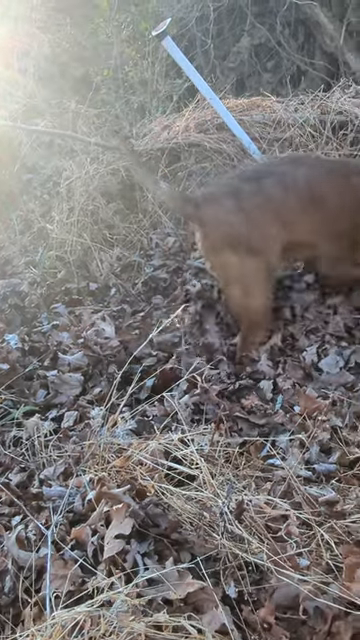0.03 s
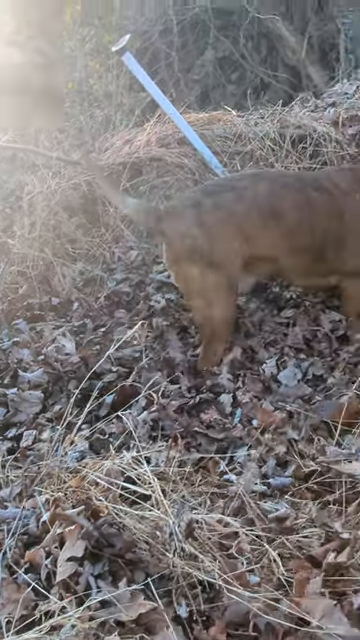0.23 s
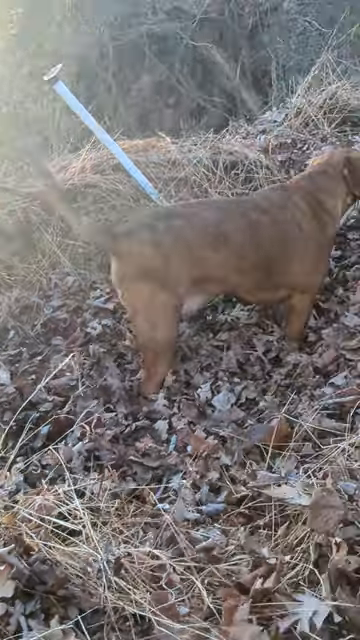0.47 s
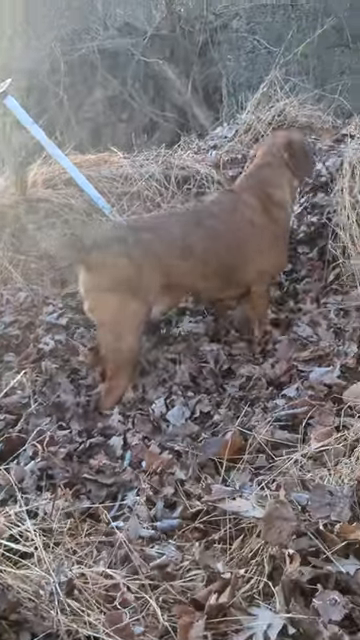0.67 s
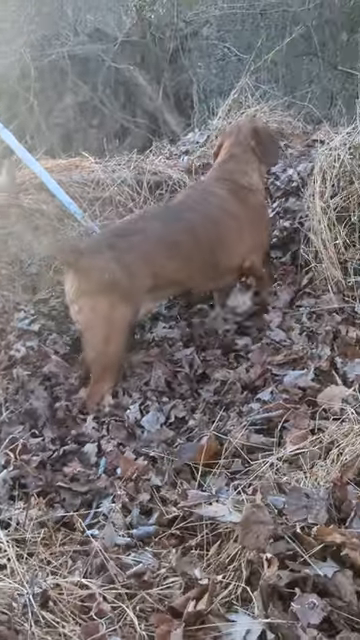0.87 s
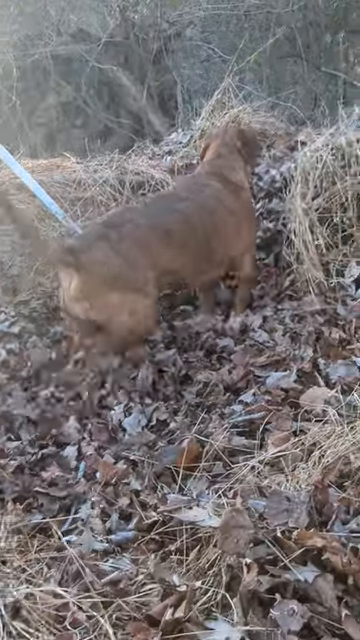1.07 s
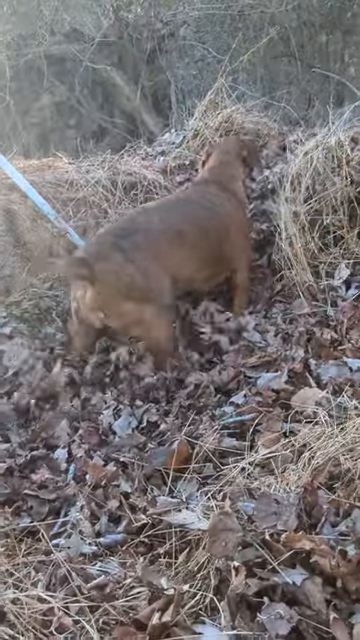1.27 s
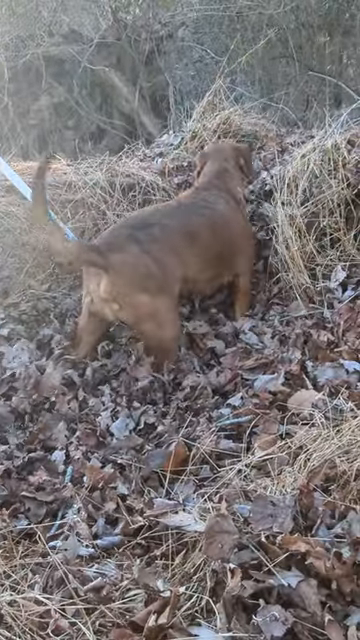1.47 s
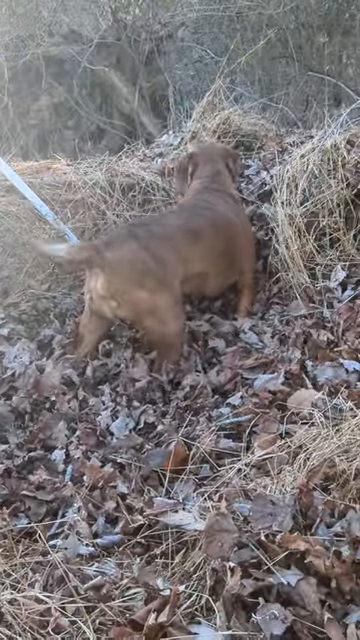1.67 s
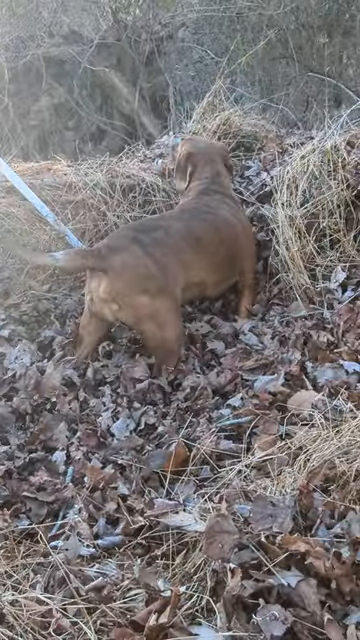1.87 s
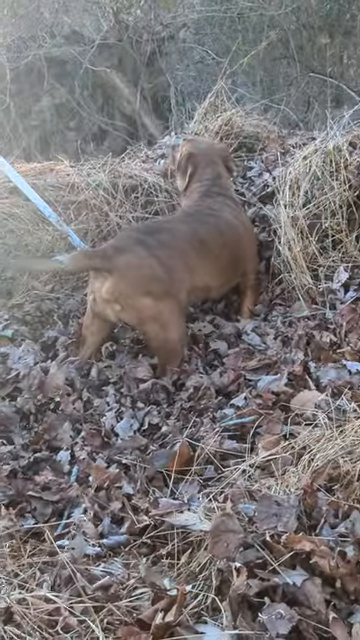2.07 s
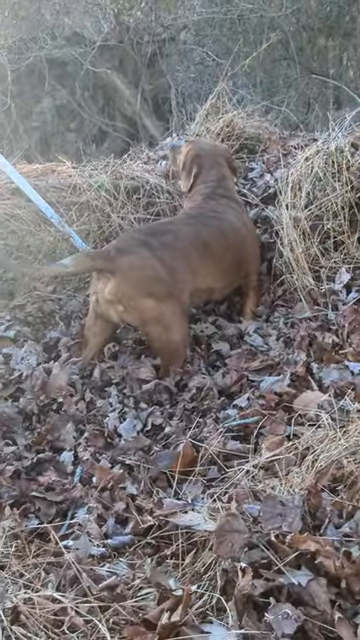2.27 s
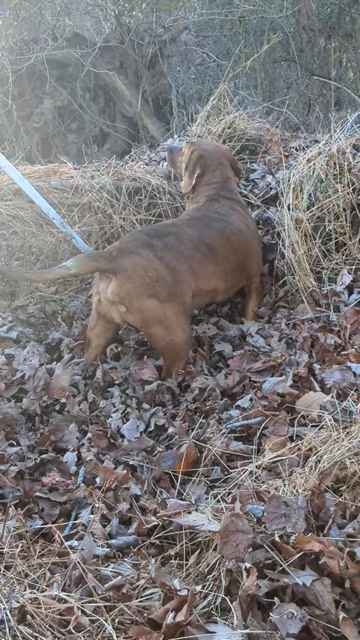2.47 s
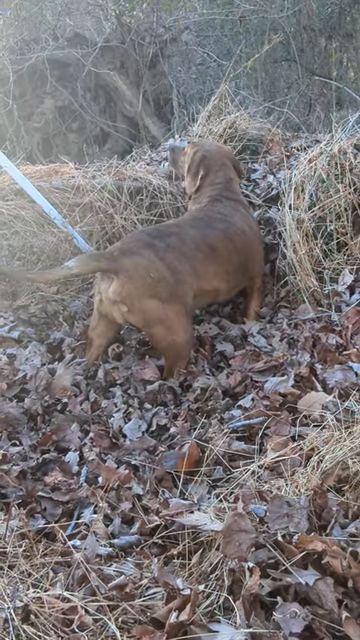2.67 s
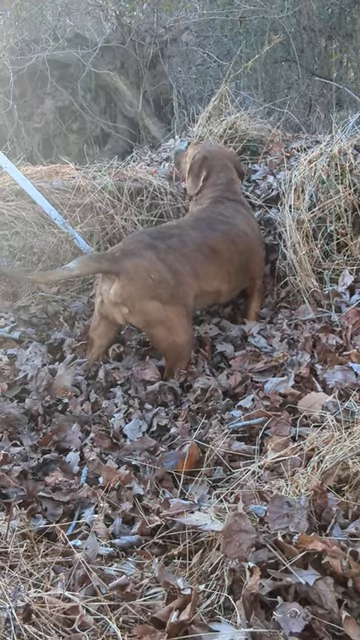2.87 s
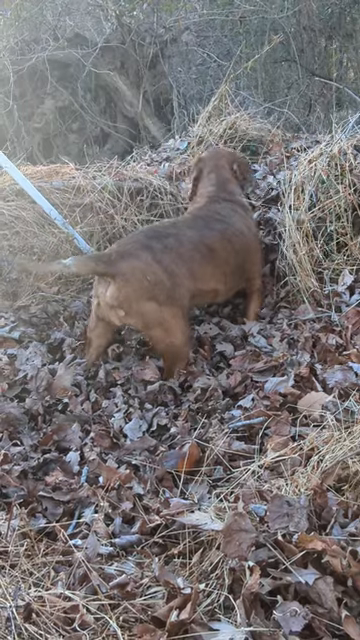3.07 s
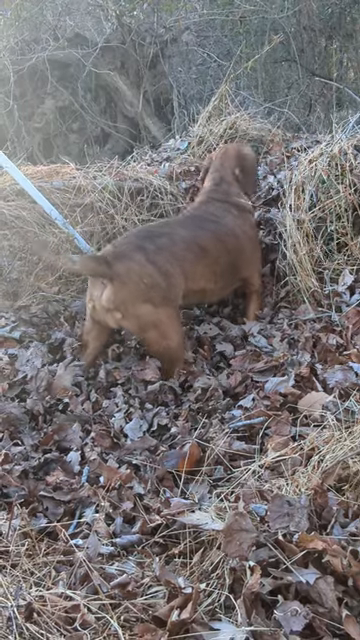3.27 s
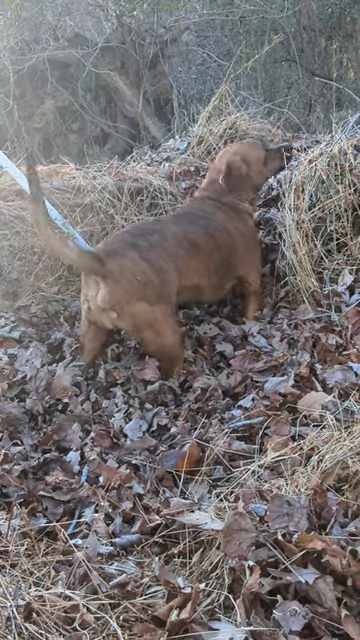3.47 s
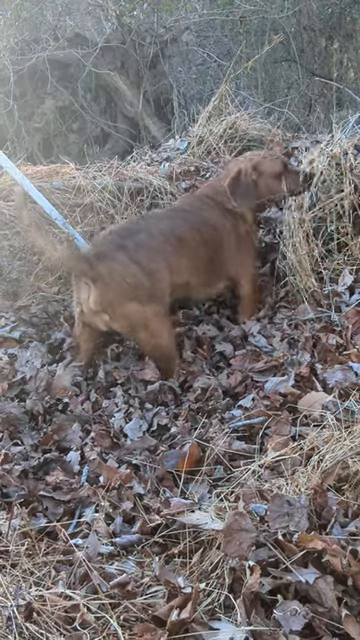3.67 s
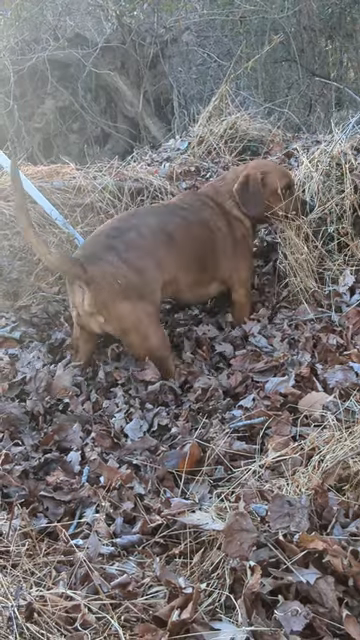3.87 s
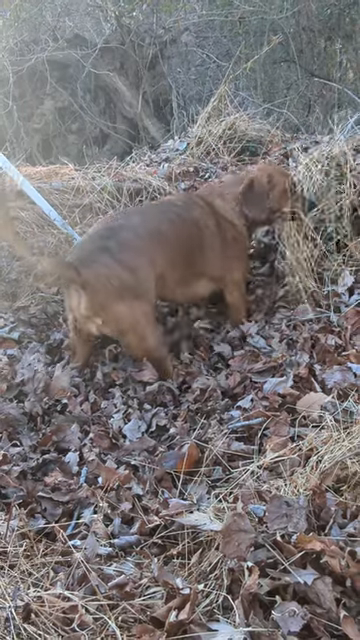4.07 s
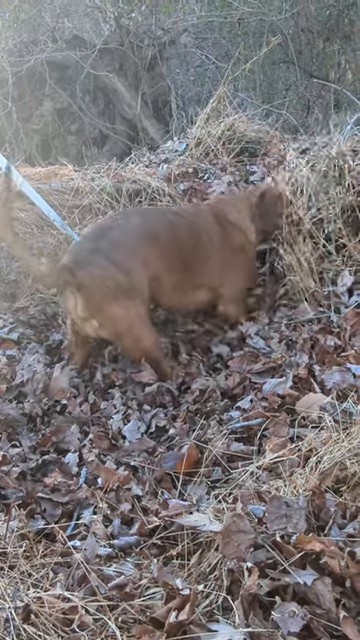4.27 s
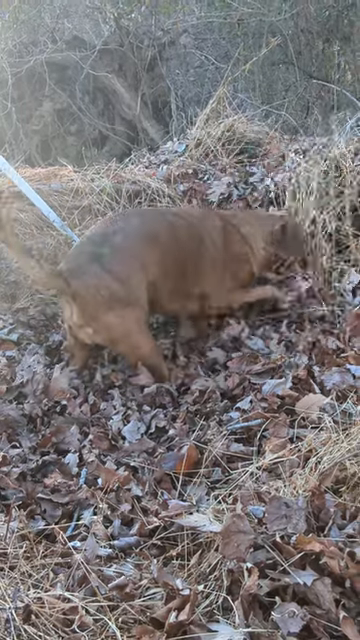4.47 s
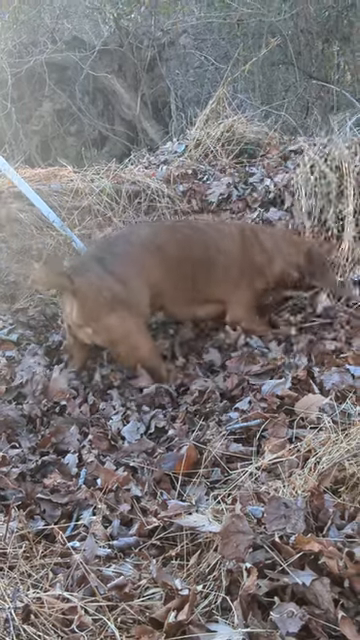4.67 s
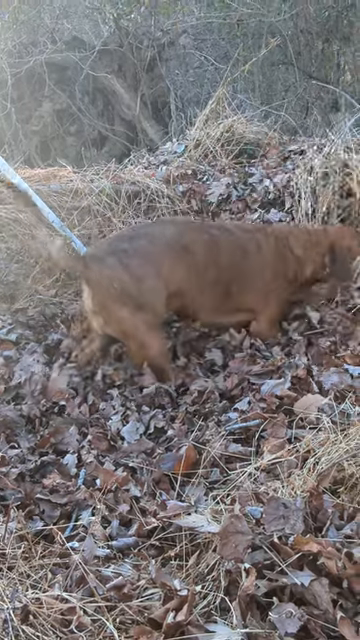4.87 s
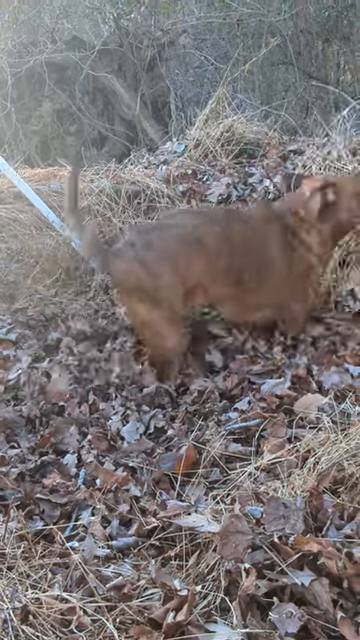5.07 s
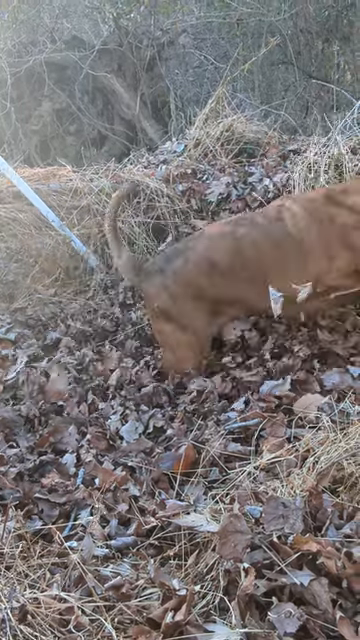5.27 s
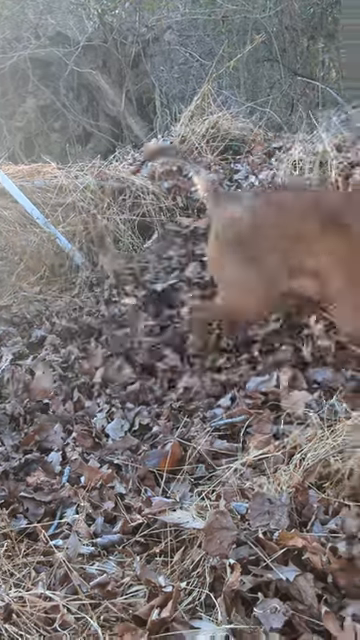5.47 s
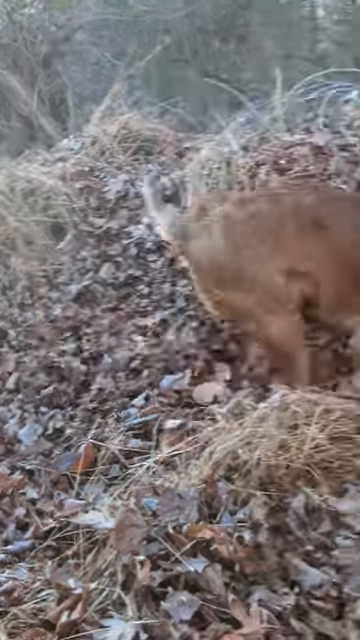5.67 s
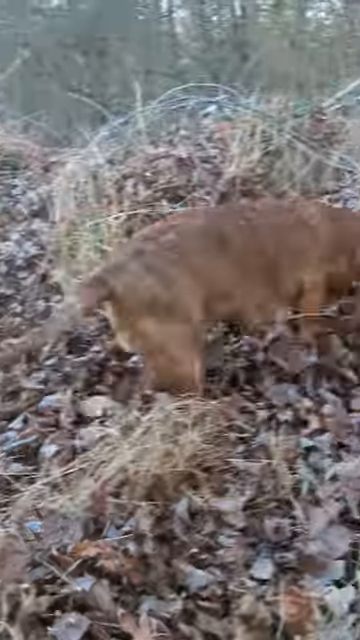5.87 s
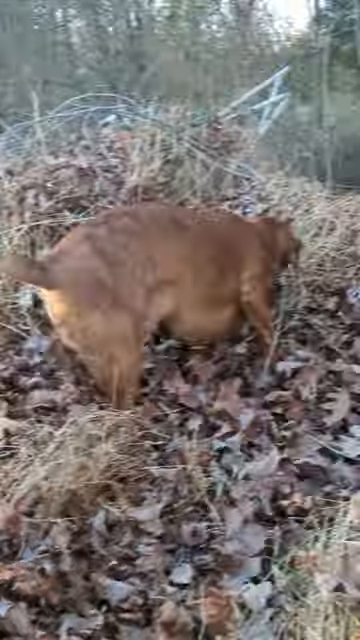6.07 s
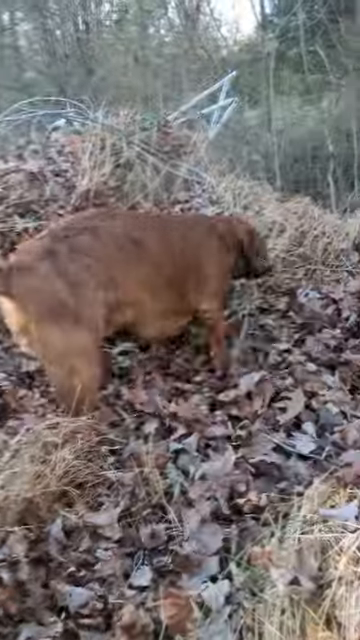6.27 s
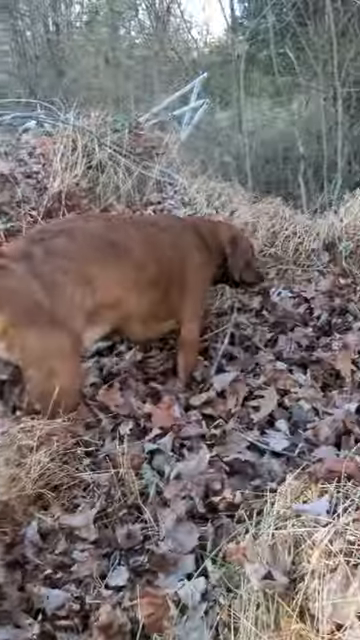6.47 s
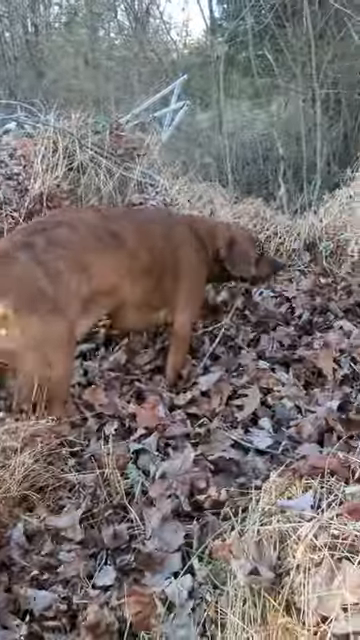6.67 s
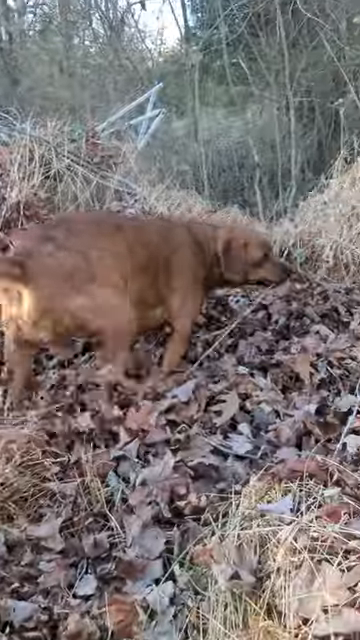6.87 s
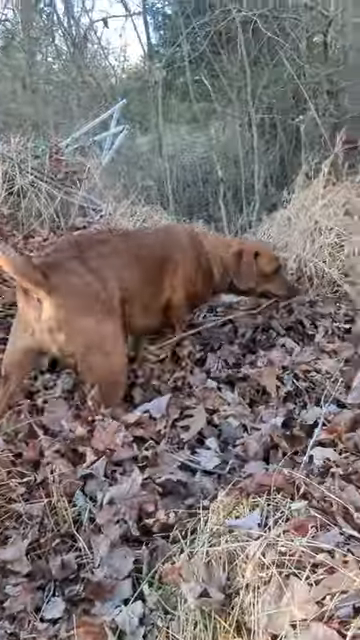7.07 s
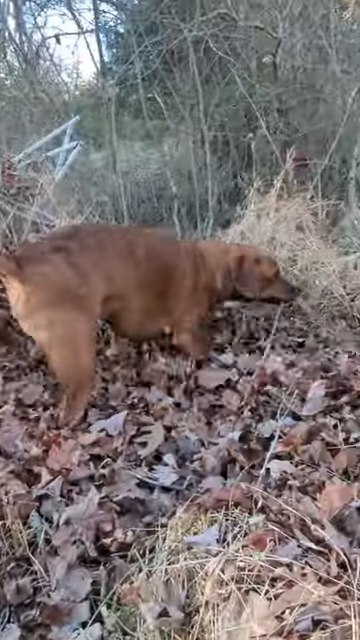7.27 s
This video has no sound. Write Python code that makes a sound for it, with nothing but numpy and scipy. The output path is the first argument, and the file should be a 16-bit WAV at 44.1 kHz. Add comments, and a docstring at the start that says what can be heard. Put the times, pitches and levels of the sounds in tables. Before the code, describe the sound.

Close stereo phone pickup of dry leaf litter being stirred in open air with no reverberation. Soft rustles and a few snaps come first, then a quiet pause with a brief scuff and sparse clicks over a faint low hum. Rustling returns in overlapping surges, strongest near the end, with sharp cracks and soft low knocks.

```python
"""Dry leaves and dead grass rustle as a dog on a leash steps and roots through them, a couple of metres from a phone.
Thousands of tiny fractures, short decaying noise bursts, make the rustle; pushes into the litter set its level.
It dies away while the dog stands, then surges as it walks on.
Stems snap as band-limited bursts, soft knocks ring as damped low modes and one brief scuff is fine-grained noise.
Behind them lie a low outdoor rumble of filtered noise and a hum of two wavering sine tones."""
import sys
import numpy as np
from scipy import signal
from scipy.fft import rfft, irfft, next_fast_len
from scipy.io import wavfile
from scipy.ndimage import uniform_filter1d

SR = 44100
rng = np.random.default_rng(int(sys.argv[2]) if len(sys.argv) > 2 else 0)


def generate_wav(signal):
    """Clip the signal to [-1, 1] and save it as 16-bit WAV at the path in sys.argv[1]."""
    frames = np.transpose(np.atleast_2d(signal))
    scaled = np.clip(frames, -1, 1) * 32767
    pcm = np.round(scaled).astype(np.int16)
    wavfile.write(sys.argv[1], SR, pcm)


N = 322415


def undb(db):
    """Amplitude gain is the exponential of a level: 20 dB for each factor of ten."""
    return 10 ** (np.asarray(db) / 20)


def curve(table):
    """Linear interpolation in time joins (time_s, value) points."""
    return np.interp(np.arange(N) / SR, *np.transpose(table))


def unit(x):
    """RMS normalization: the mean of the two channels is scaled to rms 1."""
    return x / np.sqrt(np.mean(x.mean(0) ** 2))


def shape(x, response):
    """Linear filtering is multiplication of the spectrum by a gain, a function of frequency in Hz."""
    size = next_fast_len(N + 4096, True)
    frequency_hz = np.maximum(np.fft.rfftfreq(size, 1 / SR), 1)
    filtered = irfft(rfft(x, size) * response(frequency_hz), size)
    return filtered[..., :N]


def colour(x, table, axis=1):
    """Spectral envelope: level points are joined by straight lines over log frequency."""
    table = np.asarray(table, float)
    log_hz, level_db = np.log(table[:, 0]), table[:, axis]
    return shape(x, lambda f: undb(np.interp(np.log(f), log_hz, level_db)))


def walk(rate):
    """Low-passed chance: random levels, renewed rate times a second and smoothed, with standard deviation 1."""
    k = max(int(SR / rate), 2)
    held = np.repeat(rng.standard_normal(N // k + 1), k)
    slewed = uniform_filter1d(held, k)[:N]
    return slewed / slewed.std()


def add(out, s, sound):
    """Superposition: a stereo sound is summed into the mix from time s on."""
    i = int(s * SR)
    out[:, i:i + sound.shape[1]] += sound[:, :N - i]


def rustle():
    """Crackling noise: crumpling leaves are a dense sheet of fractures with sparser crackles on it."""
    # colour of the leaves at the two microphones: frequency_hz, left_db, right_db
    leaf_colour = [(200, -12, -10), (400, -15, -14), (650, -7, -5), (1000, -8, -6), (1700, -4, -.5),
                   (2700, -2.7, -1.5), (3600, -3.5, -7.5), (4700, -7, -1), (6400, -3, 0), (7800, -8, -3),
                   (8700, -10, -4), (9500, -12.5, -10), (12300, -5, -6), (15500, -8, -8.5)]
    pan_db = 0.36  # left minus right
    sheet = unit(fractures(per_s=7000, spread_db=0.0, ring_ms=0.37, lead=1.8, lead_spread=1.6))
    crackle = unit(fractures(per_s=350, spread_db=-1.0, ring_ms=0.36, lead=1.8, lead_spread=2.6))
    leaves = scatter(sheet + undb(-8) * crackle, tail_ms=8, wet_db=-7)
    leaves = leaves * undb(0.66 * walk(60) + 0.68 * walk(25))  # leaves give way in little clusters
    leaves = shifting(leaves, drift_db=0.78, drift_rate=6.6, flicker_db=0.92)
    left = colour(leaves[0], leaf_colour, axis=1)
    right = colour(leaves[1], leaf_colour, axis=2)
    leaves = shade(np.array([left, right]), left_share=0.11, turn_s=0.093)

    # three bands, so that thick leaves and fine grass can be stirred separately
    above = lambda f, hz: 1 / (1 + (hz / f) ** 8)
    body = unit(shape(leaves, lambda f: (1 - above(f, 3070)) * f / np.hypot(f, 260)))
    middle = unit(shape(leaves, lambda f: above(f, 3310) - above(f, 8700)))
    top = unit(shape(leaves, lambda f: above(f, 8300)))
    body_gain, middle_gain, top_gain = stirring()
    mix = undb(-0.51) * body * body_gain
    mix = mix + undb(-0.4) * middle * middle_gain
    mix = mix + undb(-0.24) * top * top_gain
    return mix * undb(pan_db * np.array([[.5], [-.5]]))


def fractures(per_s, spread_db, ring_ms, lead, lead_spread, size=64):
    """Random point process of decaying cracks, each from its own direction and so with its own interchannel lag.

    lead and lead_spread are the mean and spread of the second channel's lag in samples."""
    starts = np.flatnonzero(rng.random(N) < per_s / SR)
    strength = undb(spread_db * np.minimum(rng.exponential(size=N), 3.5))[starts]
    lags = np.round(lead + lead_spread * rng.standard_normal(N)).astype(int)[starts]
    k = np.arange(size)
    cracks = rng.standard_normal(N)[(starts[:, None] * 67 + k) % N]  # slices of one noise pool
    cracks = cracks * strength[:, None] * np.exp(-k * 1e3 / (SR * ring_ms))
    channels = []
    for at in (starts, starts + lags):
        places = ((at[:, None] + k) % N).ravel()
        channels.append(np.bincount(places, cracks.ravel(), N))
    return np.array(channels)


def scatter(x, tail_ms, wet_db):
    """Diffuse scattering: the litter returns the smoothed energy of the cracks as fresh noise."""
    keep = np.exp(-1e3 / (SR * tail_ms))
    energy = signal.lfilter([1 - keep], [1, -keep], x ** 2)
    return x + undb(wet_db) * np.sqrt(energy) * rng.standard_normal((2, N))


def shifting(x, drift_db, drift_rate, flicker_db, count=10):
    """Independent band modulation: different leaves take turns, so each band swells and flickers by itself."""
    centres = np.linspace(np.sqrt(300), np.sqrt(16000), count)  # in square root of Hz
    out = 0
    for pick in np.eye(count):
        band = shape(x, lambda f: np.interp(np.sqrt(f), centres, pick))
        out = out + band * undb(drift_db * walk(drift_rate) + flicker_db * walk(90))
    return out


def shade(x, left_share, turn_s):
    """Acoustic shadowing: the hand makes peaks and notches, mostly at the right, that crossfade as the phone turns."""
    # shading by the hand at each aim: start_s, [(frequency_hz, width_hz, gain_db), ..]
    aims = [(0, [(2160, 200, 5), (2650, 140, 3), (3450, 1060, -4), (4820, 570, -3), (6000, 690, -1.5),
            (8300, 1700, -6.5)]), (1.15, [(1640, 67, 2.5), (2200, 790, -2), (2670, 110, -11),
            (2930, 490, 4.5), (3540, 880, -3), (4300, 940, 1.5), (8000, 3800, 1.5)]),
            (5.92, [(1180, 180, 5), (1390, 100, -15.5), (1720, 330, 3.5), (2560, 260, 0.5),
            (3230, 300, 2.5), (4690, 580, 4.5), (5700, 820, -1.5), (6330, 130, 2.5), (8400, 2600, -3.5)])]
    aim = np.searchsorted([s for s, _ in aims[1:]], np.arange(N) / SR)
    out = 0
    for k, (_, peaks) in enumerate(aims):
        ripple = lambda f: sum(db * np.exp(-2 * ((f - hz) / width) ** 2) for hz, width, db in peaks)
        held = uniform_filter1d(1. * (aim == k), int(turn_s * SR))
        out = out + held * shape(x, lambda f: undb(np.outer([left_share, 1], ripple(f))))
    return out


def stirring():
    """Incoherent sources add in power: pushes and fidgeting set the gains of the body, middle and top."""
    # pushes of a paw or the nose; thick leaves have more body than fine grass, body and top relative to the level:
    # full_pressure_s, hold_s, level_db, body_db, top_db
    pushes = [(0.017, 0.14, -50, 1.5, 1.5), (0.25, 0.083, -57.0, 2.5, 1.5), (0.67, 0.14, -55, -1, 0.5),
              (0.898, 0.15, -49.5, 0, 0), (1.179, 0.12, -42.5, 0, 2.5), (1.434, 0.014, -49, 2, 7),
              (1.6, 0.06, -60.5, 4.5, 6.5), (1.805, 0.04, -68.5, 7, 4), (2.2, 0.04, -74.5, 0.5, -3),
              (3.108, 0.081, -65, 0, 0.5), (3.698, 0.16, -56.5, -2, -0.5),
              (4.003, 0.041, -43.0, -2.5, -2.0), (4.348, 0.065, -47.5, -2.5, -4.5),
              (4.528, 0.04, -42.5, -9, -3.5), (4.664, 0.023, -39.5, -4.5, -5),
              (4.778, 0.088, -44, -2.0, -5.5), (5.008, 0.093, -40.5, -2, -0.5),
              (5.184, 0.13, -38.5, -6.5, -4.5), (5.396, 0.094, -38.5, -5, -4.5),
              (5.677, 0.073, -36.0, -3.5, -1.5), (5.866, 0.038, -41, -2, -1.5),
              (5.995, 0.07, -47.5, 0, -5.0), (6.14, 0.023, -40.5, -3.5, 0.5),
              (6.305, 0.1, -45.5, -0.5, -0.5), (6.508, 0.022, -51.5, -1.5, 3),
              (6.801, 0.11, -46.0, -2.5, 2), (6.956, 0.034, -41.5, -0.5, 0.5),
              (7.213, 0.064, -39.5, -3.5, 0.5)]
    # light stirring between the pushes, least while the dog stands still: time_s, level_db
    fidget = [(0, -57), (1.4, -59.5), (2, -74.5), (2.5, -79), (2.9, -77), (3.05, -70.5), (3.5, -69),
              (4.05, -51), (4.28, -58.5), (4.4, -54.5), (7.31, -53)]
    fidget_body_db, fidget_top_db = .5, -1.5  # relative to its level
    press_s, release_s = 0.062, 0.063  # time constants of the weight coming on and off
    settle_db, settle_s = -15.5, 0.14  # bent leaves go on springing back after each push
    power = undb(curve(fidget) + np.array([[fidget_body_db], [0], [fidget_top_db]])) ** 2
    settle = undb(settle_db)
    for s, hold_s, db, body_db, top_db in pushes:
        push = (1 - settle) * gesture(s, hold_s, press_s, release_s)
        push = push + settle * gesture(s, hold_s, press_s, settle_s)
        band_gains = undb([db + body_db, db, db + top_db])
        power += np.outer(band_gains ** 2, push ** 2)
    return np.sqrt(power)


def gesture(s, hold_s, attack_s, release_s):
    """Exponential growth and decay: a gain rises to 1 at time s, holds and dies away."""
    t = np.arange(N) / SR - s
    rise = np.minimum(t, 0) / attack_s
    fall = np.maximum(t - hold_s, 0) / release_s
    return np.exp(np.maximum(rise - fall, -30))


def snaps(size=2048):
    """Impulsive fracture: a stem cracks and splinters in a band, with a strong, slightly longer echo from the litter."""
    # stems and leaf ribs that snap, save the sharp click at 2.126 s within the rub: start_s, level_db,
    # centre_hz, decay_ms
    stems = [(0.457, -39, 2500, 1.2), (0.5315, -35, 3000, 1.1), (0.5747, -28, 4800, 1),
             (0.797, -32.5, 4000, 1.1), (.9995, -27, 1890, 1.2), (2.006, -45, 4000, 1),
             (2.126, -29, 2500, .6), (2.367, -50, 9000, 2), (2.407, -41.5, 1400, 2.2),
             (2.4215, -46, 1490, 3.6), (2.643, -49, 7000, 3), (2.7693, -45, 6860, 2.3),
             (2.939, -48, 6000, 3.1), (3.293, -44, 4500, 2.4), (3.482, -41.5, 6000, 1.7),
             (3.58, -39, 6000, 4), (3.754, -30, 6860, 2.2), (4.126, -30, 5500, 2), (4.272, -32, 14000, 1.3),
             (4.332, -36, 6030, 1.2), (5.664, -23, 5030, 2.3), (5.695, -17.5, 2510, 1.3),
             (5.7624, -13.5, 4080, 1.7), (5.9675, -26, 6000, 1.1), (6.051, -27, 2200, 3),
             (6.555, -28.5, 9000, 4), (7.1582, -11, 13700, 1.9), (7.195, -23, 3000, 4.5)]
    out, ms = np.zeros((2, N)), np.arange(size) * 1e3 / SR
    for s, db, hz, decay_ms in stems:
        splinters = rng.standard_normal(size) + 2.5 * rng.standard_normal((2, size))  # shared + separate
        burst = splinters * (np.exp(-ms / decay_ms) + undb(-3.5) * np.exp(-ms / 6))  # splinters + litter echo
        burst[:, 8] += 2.2  # the crack itself
        band = signal.butter(2, [hz / 2.4, min(hz * 2.2, 19000)], "band", fs=SR, output="sos")
        burst = signal.sosfilt(band, burst)
        add(out, s, undb(db - 1.5) * burst / np.abs(burst).max())
    return out


def knocks(size=8192):
    """Damped resonance: each soft blow rings one low mode and crushes litter around the same pitch."""
    # dull knocks and footfalls: start_s, level_db, pitch_hz, decay_ms
    blows = [(.878, -25.5, 567, 0.68), (2.128, -29, 620, 1.3), (2.407, -48, 905, 0.9),
             (2.421, -47, 680, 1.7), (4.209, -42, 600, 1.6), (4.301, -37, 625, 2.8),
             (4.683, -31.5, 736, 0.85), (4.75, -46, 108, 45), (4.813, -47, 108, 40), (4.82, -41, 610, 5),
             (5.123, -40.5, 257, 3.8), (5.764, -36, 526, 8.2), (5.766, -39.5, 240, 5.9),
             (5.841, -36, 144, 8.7), (5.875, -33, 310, 2.6), (5.895, -30.5, 302, 2.9),
             (6.399, -35, 117, 8.4), (6.4, -34.5, 560, 1.8), (6.492, -35, 333, 5.1),
             (6.607, -36.5, 407, 4.1)]
    out, t = np.zeros((2, N)), np.arange(size) / SR
    f = np.maximum(np.fft.rfftfreq(size, 1 / SR), 1)
    for s, db, hz, decay_ms in blows:
        ring = np.sin(2 * np.pi * hz * t) * np.exp(-t * 1e3 / decay_ms)
        near_pitch = np.exp(-(np.log2(f / hz) / 0.5) ** 2 / 2)  # bell of half an octave
        crush = unit(irfft(rfft(rng.standard_normal((2, size))) * near_pitch))
        crush = crush * undb(-19) * np.exp(-t * 1e3 / (3.0 * decay_ms))
        add(out, s, undb(db) * (ring + crush) * undb([[-1.2], [1.2]]))
    return out


def scuff():
    """Friction noise: a brief rub close to the phone is a dense train of fine fractures, louder at the right."""
    # colour of the rub: frequency_hz, level_db
    rub_colour = [(100, 1), (300, -12), (600, -4), (1700, -0.5), (4500, -5), (8000, -5), (11000, -18.5),
                  (16000, -23)]
    level_db = -49
    grit = fractures(per_s=12000, spread_db=1.4, ring_ms=.3, lead=2, lead_spread=5)
    rub = undb(level_db) * gesture(2.077, hold_s=0.064, attack_s=0.00078, release_s=0.016)
    return unit(colour(grit, rub_colour)) * rub * undb([[-3], [2]])


def outdoors():
    """Spatial coherence: low rumble is most alike at both microphones in the deep bass, beneath a two-tone hum."""
    # slow course of the rumble: time_s, level_db
    rumble_level = [(0, -61.5), (3.6, -64.5), (4.6, -58.5), (7.31, -55.5)]
    # colour of the rumble: frequency_hz, level_db
    rumble_colour = [(20, -15), (35, -27), (60, 4.5), (120, 4), (230, 1.5), (370, -12.5), (650, -9.5),
                     (1300, -12.5), (3000, -35), (15000, -55)]
    # two wavering low tones: lower_hz, upper_hz
    hum_hz = (52.6, 108)
    waver_db = (1.8, 2.8)  # lower, upper
    apart = shape(rng.standard_normal((2, N)), lambda f: f / (f + 160))
    rumble = unit(colour(rng.standard_normal(N) + apart, rumble_colour))
    out = rumble * undb(curve(rumble_level) + 1.0 * walk(8))
    for hz, gain, spread_db in zip(hum_hz, hum_levels(), waver_db):
        phase = 2 * np.pi * np.cumsum(hz * (1 + 0.0241 * walk(13))) / SR
        out = out + np.sqrt(2) * np.sin(phase) * gain * undb(spread_db * walk(11))
    return out * undb([[-.9], [.9]])


def hum_levels():
    """Power summation: the lower tone's gain grows steadily in dB, the upper's adds swells to a floor."""
    # swells of the upper tone: crest_s, half_width_s, level_db
    swell_table = [(.28, 0.18, -61.5), (1.79, 0.098, -59.5), (4.78, 0.082, -58), (5.4, .12, -58.5),
                   (5.88, .09, -55), (6.48, 0.11, -53.5), (7.05, 0.15, -62)]
    lower_db, rise_db_per_s = -69, 1.82
    upper_db = -66.5
    t = np.arange(N) / SR
    swells = sum((undb(db) * np.exp(-((t - s) / width_s) ** 2)) ** 2 for s, width_s, db in swell_table)
    lower_gain = undb(lower_db + rise_db_per_s * t)
    upper_gain = np.sqrt(undb(upper_db) ** 2 + swells)
    return lower_gain, upper_gain


def scene():
    """Superposition in open air: all sources simply add."""
    return rustle() + snaps() + knocks() + scuff() + outdoors()


def record(dry):
    """Band limitation: the phone cuts the deepest bass and the top."""
    top_hz = 15850
    thin = signal.sosfilt(signal.butter(2, 42, "high", fs=SR, output="sos"), dry)
    return signal.sosfilt(signal.ellip(10, .2, 70, top_hz, fs=SR, output="sos"), thin)


dry = scene()
out = record(dry)
generate_wav(out)
```